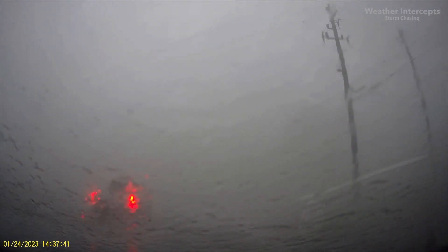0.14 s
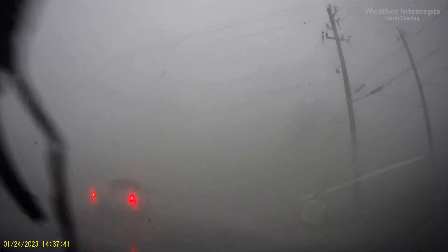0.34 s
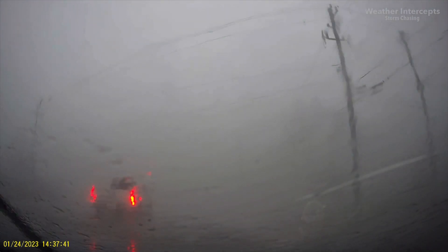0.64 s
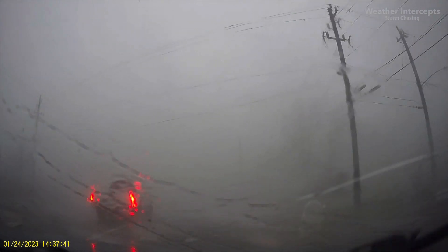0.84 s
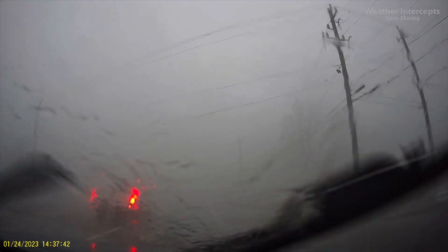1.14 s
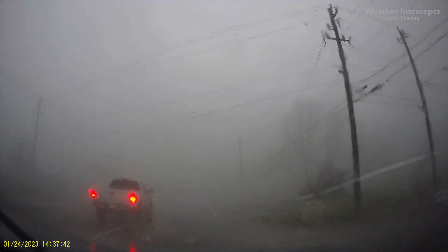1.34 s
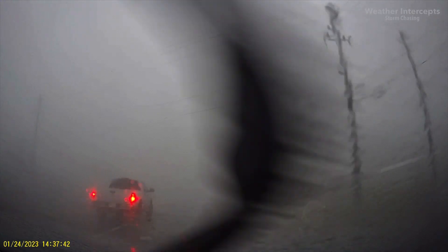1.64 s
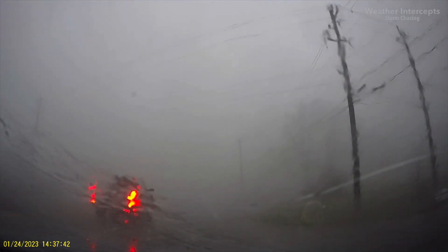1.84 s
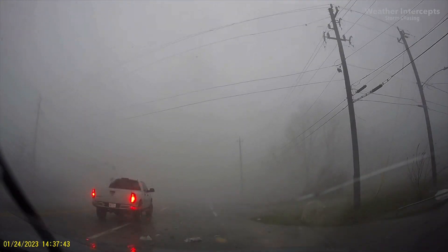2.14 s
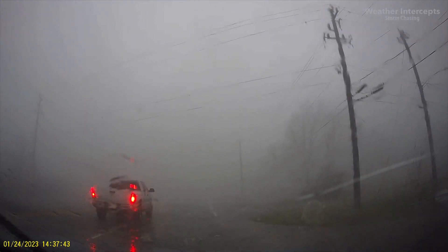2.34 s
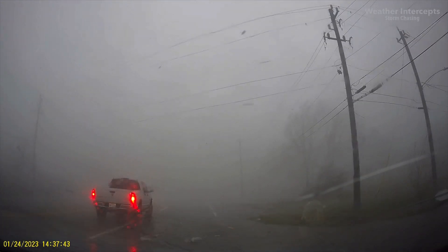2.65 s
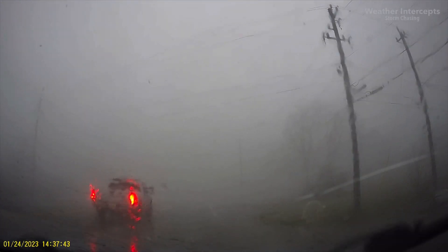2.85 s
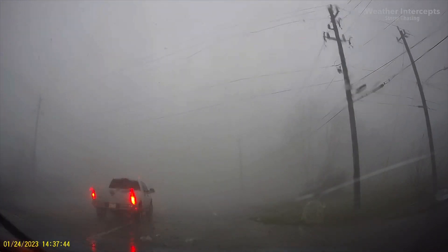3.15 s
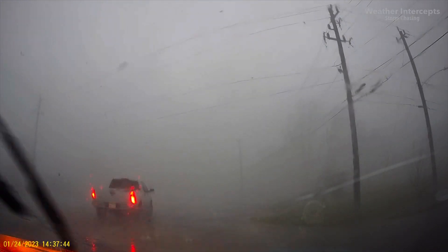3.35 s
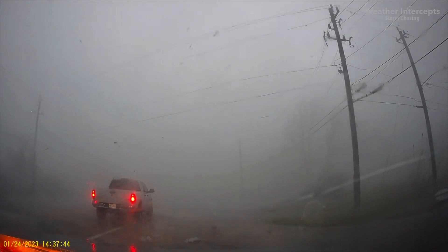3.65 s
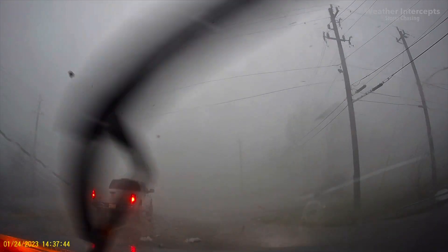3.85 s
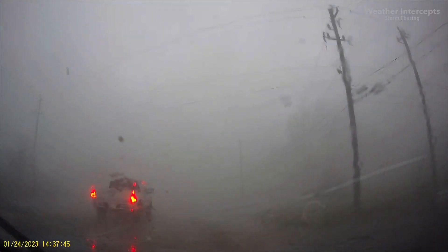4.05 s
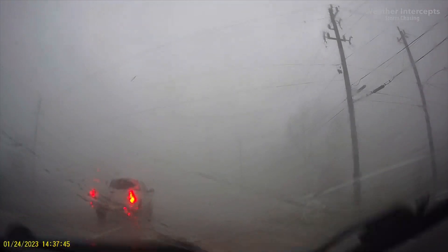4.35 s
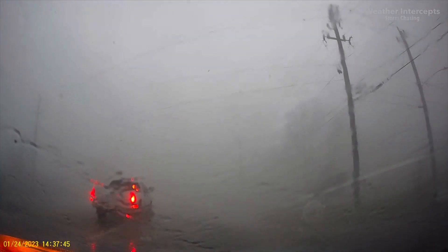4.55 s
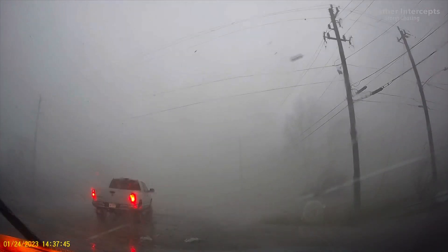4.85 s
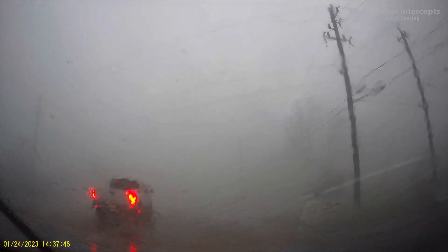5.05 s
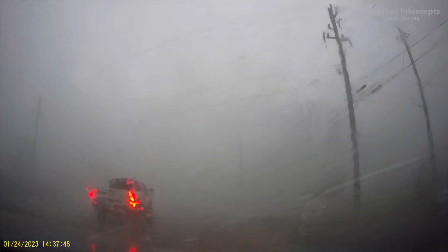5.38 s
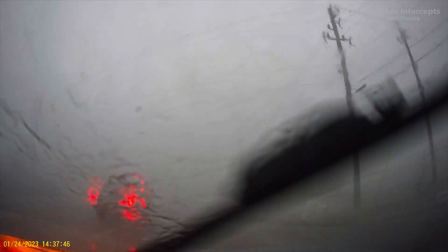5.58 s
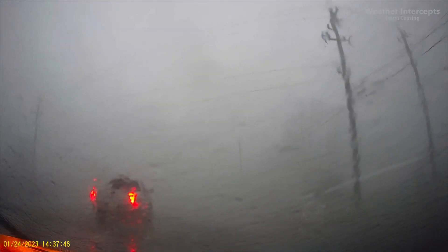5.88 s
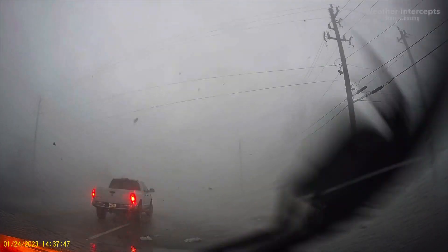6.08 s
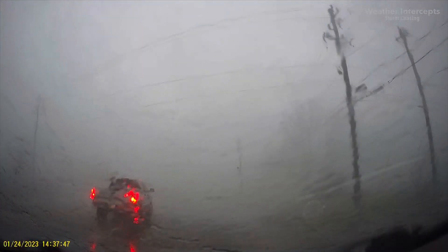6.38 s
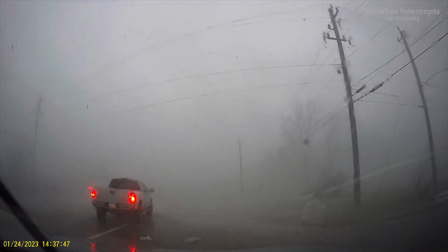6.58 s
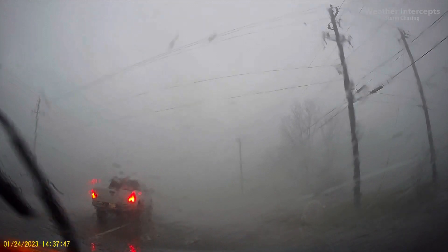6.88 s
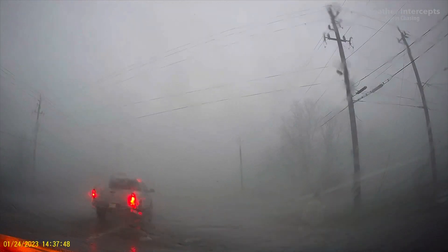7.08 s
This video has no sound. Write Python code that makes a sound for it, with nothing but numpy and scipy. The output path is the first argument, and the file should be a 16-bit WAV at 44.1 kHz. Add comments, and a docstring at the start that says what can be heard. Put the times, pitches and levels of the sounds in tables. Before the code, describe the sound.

Inside a parked vehicle in a violent storm, with a close mono microphone behind the windscreen, dry padded acoustics and a cut-off top end. From 0 s, deep unsteady wind booms in the cabin over a muffled outside roar, while rain drums on roof and glass, swelling in short sheets, strong at the start and near 1.6, 2.3, 2.8 and 5.6 s. Wipers give soft low bumps around 0.15, 1.0 (faint), 1.9, 2.8 (strongest), 3.7, 4.6, 5.4, 6.3 and 7.2 s. At 0.8 s debris slams the body: a heavy, loud multi-panel bang with short rattle. Grit ticks sharply from 0.13 s, thickest at 2.4-3 s, then sparse. Weaker thuds come from 2.4 s, including 2.8, 4.2, 4.8 (fuller), 5.3 and lastly 6.6 s. Wind and rain continue to the end.

```python
"""Inside a parked vehicle in a violent storm, heard from behind the windscreen for about 7 seconds.
From the start gusts boom in the cabin and roar outside, and sheets of rain drum on roof and glass.
Grit soon ticks on the glass, and the wipers bump at the end of each sweep, about every 0.9 s.
Flying debris strikes the body hard at 0.8 s. From 2.4 s come weaker thuds, the last at 6.6 s, with
grit thickest from 2.4 to 3 s. Noise makes wind and rain; fading tones make thuds and wiper bumps."""
import sys
import numpy as np
from scipy import signal
from scipy.fft import rfft, irfft
from scipy.io import wavfile
from scipy.ndimage import uniform_filter1d

SR = 44100
rng = np.random.default_rng(int(sys.argv[2]) if len(sys.argv) > 2 else 0)


def persist_wave(psi):
    """Save psi, clipped to +-1, as 16-bit WAV."""
    counts = np.round(np.clip(psi, -1, 1) * 32767).astype(np.int16)
    wavfile.write(sys.argv[1], SR, np.atleast_2d(counts).T)


N = 318402  # length [samples]

# storm strength: (time [s], cabin boom [dB], roar over the body [dB], extra drumming on the roof [dB])
STORM = [(0, -25, -31.5, 1), (.2, -24, -35, -5), (.3, -29, -37, -4), (.68, -27.5, -35.5, -2.5),
         (1.0, -31, -40, -2.5), (1.25, -27.5, -41.5, -5), (1.6, -34, -38, -2), (1.95, -29.5, -38.5, 1.5),
         (2.4, -36, -32.5, 2), (2.56, -33.5, -34, 0), (2.68, -29.5, -33, -1.5), (3.1, -26.5, -34, -2),
         (3.5, -30, -31, -3), (3.8, -26.5, -33.5, -5.5), (4.0, -28, -38.5, -4), (4.3, -29.5, -36.5, -3.5),
         (4.75, -27, -35, -2), (4.84, -25, -35.5, -2.5), (4.95, -36, -34.5, -2), (5.17, -28.5, -34.5, 0.5),
         (5.5, -28.5, -31, -5), (5.7, -27, -34.5, -0.5), (6.1, -31, -34.5, -3), (6.27, -28.5, -36, 2.5),
         (6.39, -25, -33.5, -1.5), (6.48, -44, -36.5, -2), (6.7, -33.5, -33, 0.5), (6.87, -29.5, -32, 1),
         (7.02, -38, -34.5, 1), (7.1, -27, -35.5, 2.5), (7.22, -36, -34, 1.5)]
# tone colour of the roof when struck: (frequency [Hz], relative gain [dB])
ROOF_COLOUR = [(15, -39.5), (150, -4), (350, -2), (480, -7.5), (550, 2), (800, 0.5), (1150, -2), (1350, -8),
               (1700, -15), (2100, -14), (2550, -44.5), (7000, -42)]
# tone colour of the glass when struck: (frequency [Hz], relative gain [dB])
GLASS_COLOUR = [(15, -63), (700, -40), (1700, 2), (2200, -4.5), (2550, -5), (2920, 2), (3300, -1),
                (4100, -1.5), (5200, -4), (6200, -11), (6800, -7), (7400, -23.5)]


def undb(db):
    """Turn decibels into an amplitude factor."""
    return 10 ** (np.asarray(db) / 20)


def unit(x):
    """Scale a sound to an average (RMS) strength of 1."""
    return x / np.sqrt(np.mean(x ** 2))


def curves(rows):
    """Join the points of each column with straight lines over the whole scene."""
    times, *columns = np.transpose(rows)
    return [np.interp(np.arange(N) / SR, times, column) for column in columns]


def fade(t60, size):
    """Exponential dying away that falls 60 dB in t60 seconds (at least 3 ms)."""
    return np.exp(-np.log(1000) * np.arange(size) / SR / max(t60, .003))


def colour(x, points):
    """Filter to a given spectrum without sounding early, using the cepstrum of the log gain."""
    hz, db = np.transpose(points)
    size = 8192
    log_hz = np.log(np.fft.rfftfreq(size, 1 / SR) + 1)
    log_gain = np.interp(log_hz, np.log(hz), db) * np.log(10) / 20
    cepstrum = irfft(log_gain)
    # fold the second half onto the first, so that the response starts at once
    cepstrum[1:size // 2] *= 2
    cepstrum[size // 2 + 1:] = 0
    response = irfft(np.exp(rfft(cepstrum)))
    return signal.oaconvolve(x, response)[:len(x)]


def ring(x, hz, width):
    """One resonance of the given width in Hz, with gain 1 at its centre."""
    return signal.lfilter(*signal.iirpeak(hz, hz / width, fs=SR), x)


def walk(rate):
    """Random wandering: levels held for 1 / rate seconds, then smoothed twice; RMS 1."""
    hold = int(SR / rate)
    levels = rng.standard_normal(N // 50)[:N // hold + 1]
    steps = np.repeat(levels, hold)
    smooth = uniform_filter1d(uniform_filter1d(steps, hold), hold)
    return unit(smooth[:N])


def drops(per_s, spread_db, hiss):
    """Noise bursts at random moments, some larger, each fading over a few ms above a steady hiss."""
    hit = rng.random(N) < per_s / SR
    size = np.minimum(rng.exponential(size=N), 3.5)
    power = hit * undb(2 * spread_db * size)
    splash = signal.lfilter([1], [1, -np.exp(-1 / (.0015 * SR))], power)  # fades over 1.5 ms
    return np.sqrt(splash / splash.mean() + hiss ** 2) * rng.standard_normal(N)


def wind():
    """Turbulence rings the cabin air and roars in eddies over the body."""
    # cabin air and door panels: (frequency [Hz], width [Hz], relative level [dB])
    cabin_modes = [(43.1, 13.1, 0), (29, 11.9, 0), (62.6, 46, -13)]
    # tone colour of the roar: (frequency [Hz], relative gain [dB])
    roar_colour = [(15, -23), (60, -4), (110, -2), (200, -4.5), (300, -8.5), (420, -13), (700, -21.5),
                   (1500, -65.5), (7000, -75)]
    buffet_db, buffets_per_s = 1.5, 12
    boom_db, roar_db, _ = curves(STORM)
    boom = 0
    for hz, width, db in cabin_modes:
        mode = ring(ring(rng.standard_normal(N), hz, width), hz, 3 * width)
        boom = boom + undb(db) * unit(mode)
    # buffeting feeds on itself, so its strength holds steadier than plain noise
    power = uniform_filter1d(boom ** 2, int(0.037 * SR))
    boom = boom / (power + .05) ** 0.23
    roar = colour(drops(300., 2.5, 1.0), roar_colour)
    boom_level = undb(boom_db + buffet_db * walk(buffets_per_s))
    roar_level = undb(roar_db + 0.87 * walk(26))
    return unit(boom) * boom_level + unit(roar) * roar_level


def spray_db():
    """Each sheet of rain swells to its peak and dies away; their powers add over the drizzle."""
    # sheets: (time of the peak [s], spray on the glass [dB], rise [s per 10 dB], fading [s per 10 dB])
    sheets = [(-0.015, -40.2, 0.023, 0.04), (0.113, -39.9, 0.201, 0.065), (0.353, -52.1, 0.085, 0.131),
              (0.483, -46.2, 0.43, 0.05), (0.677, -44.2, 0.113, 0.075), (1.203, -55.8, 0.081, 0.057),
              (1.405, -47.4, 0.027, 0.244), (1.635, -36.1, 0.108, 0.061), (1.792, -45.5, 0.184, 0.12),
              (2.099, -51.2, 0.113, 0.09), (2.303, -37.5, 0.069, 0.123), (2.422, -46.9, 0.146, 0.021),
              (2.609, -49.6, 0.062, 0.219), (2.799, -41.3, 0.153, 0.115), (3.111, -49.4, 0.332, 0.103),
              (3.279, -55.3, 0.124, 0.197), (3.407, -55.8, 0.175, 0.206), (3.621, -60.8, 0.582, 0.113),
              (3.893, -58.4, 0.082, 0.12), (4.049, -49.6, 0.08, 0.093), (4.224, -49.7, 0.057, 0.415),
              (4.366, -44.9, 0.145, 0.139), (4.576, -52.4, 0.254, 0.032), (4.955, -42.6, 0.085, 0.126),
              (5.175, -46.4, 0.114, 0.089), (5.297, -44.9, 0.096, 0.101), (5.458, -47.8, 0.071, 0.094),
              (5.618, -40.3, 0.059, 0.157), (5.792, -50.7, 0.511, 0.066), (6.015, -52.2, 0.094, 0.051),
              (6.272, -45.8, 0.381, 0.463), (6.746, -55.6, 0.27, 0.514), (6.932, -47.5, 0.025, 0.175),
              (7.033, -44.2, 0.032, 0.168), (7.156, -42.1, 0.145, 0.193)]
    drizzle_db = -66  # spray between the sheets
    t = np.arange(0, N, 64) / SR
    peak_s, db, rise, fading = np.transpose(sheets)[:, :, None]
    s_per_10_db = np.maximum(np.where(t < peak_s, rise, fading), 1 / 100)
    sheets_db = db - 10 * np.abs(t - peak_s) / s_per_10_db
    power = undb(2 * drizzle_db) + undb(2 * sheets_db).sum(axis=0)
    return np.interp(np.arange(N) / SR, t, 10 * np.log10(power))


def rain():
    """Sheets of drops strike roof and glass together, in patches."""
    roof_offset_db, roof_follows = -10, 0.62  # the roof takes this share of the spray level in dB
    glass_db = spray_db()
    extra_db = curves(STORM)[-1]
    roof_db = roof_offset_db + roof_follows * glass_db + extra_db
    patches = walk(25)
    splash = drops(570.0, 3.1, 1.4)
    roof = unit(colour(splash, ROOF_COLOUR)) * undb(roof_db + 0.7 * patches)
    glass_level = undb(glass_db + 0.45 * patches + .8 * walk(70))
    glass = unit(colour(splash, GLASS_COLOUR)) * glass_level
    return roof + glass


def cabin(x):
    """Short, padded reverberation of the seats and glass, made from fading noise."""
    t60_s, level_db = 0.06, -9
    size = SR // 4
    tail = rng.standard_normal(size) * fade(t60_s, size)
    tail = tail / np.sqrt(np.sum(tail ** 2))
    return x + undb(level_db) * signal.oaconvolve(x, tail)[:N]


def ticks():
    """Grit snaps in a burst of noise that rings the pane near its pitch and also knocks in the roof."""
    # grit on the glass: (time [s], peak [dB], pitch [Hz], share of ringing [0-1])
    grit = [(0.1336, -23, 4410, 0.38), (0.356, -33, 3000, 0.3), (0.946, -37.5, 4730, 0.14),
            (1.3991, -34, 2840, 0), (1.746, -29, 3530, 0.3), (1.997, -40, 2910, 0.2),
            (2.093, -26.5, 3160, 0.2), (2.263, -28.5, 2840, 0.07), (2.4325, -27, 3900, 0.4),
            (2.413, -38, 3100, 0.2), (2.444, -28, 3240, 0.3), (2.597, -32, 2780, 0.2),
            (2.6106, -20.5, 2930, 0.25), (2.7032, -27, 2870, 0.1), (2.7786, -34, 2730, 0.64),
            (2.802, -19.5, 4100, 0.34), (2.8366, -30.5, 2950, 0.2), (2.8696, -27, 3300, 0.2),
            (3.0302, -24, 4050, 0.7), (3.034, -39, 4030, 0.5), (3.3732, -35.5, 3480, 0.5),
            (3.8012, -36.5, 3280, 0.2), (4.072, -32, 2830, 0.4), (4.7666, -37, 2900, 0.27),
            (4.831, -33, 3160, 0.2), (5.602, -29, 3360, 0.1), (6.023, -30.5, 2900, 0.26),
            (6.9226, -28, 3000, 0)]
    t60_s = .013
    out, size = np.zeros(N + SR), SR // 8
    for s, db, hz, share in grit:
        burst = rng.standard_normal(size) * fade(t60_s, size)
        burst[0] += 5  # first contact
        crack = unit(colour(burst, GLASS_COLOUR)) + unit(colour(burst, ROOF_COLOUR))
        share = np.clip(share, 0, 1)
        ringing = unit(ring(ring(crack, hz, 700.), hz, 900.))
        crack = (1 - share) * unit(crack) + share * ringing
        start = int(s * SR)
        out[start:start + size] += undb(db) * crack / np.abs(crack).max()
    return out[:N]


def wiper():
    """Rubber presses softly, so the cowl swells for a few cycles and then dies away."""
    # bumps at the end of each sweep: (time [s], level [dB], pitch of the cowl [Hz], t60 [s])
    bumps = [(0.151, -22.5, 195, 0.094), (1.025, -38.5, 212, 0.12), (1.92, -20, 140, 0.046),
             (1.939, -24, 201, 0.06), (2.794, -15.5, 202, 0.079), (3.641, -21, 289, 0.051),
             (3.696, -23, 263, 0.063), (4.571, -21, 212, 0.032), (5.44, -22.5, 192.6, 0.14),
             (6.335, -19, 183, 0.019), (7.198, -22.5, 217, 0.084)]
    swell_s = 0.014
    out, size = np.zeros(N + SR), SR // 4
    t = np.arange(size) / SR
    for s, db, hz, t60 in bumps:
        dying = fade(t60, size)
        # the fade is scaled to begin at full strength when the swell ends
        shape = np.where(t < swell_s, t / swell_s, dying / dying[int(swell_s * SR)])
        tone = np.sin(2 * np.pi * hz * t)
        tone += 0.12 * np.sin(2 * np.pi * 1.402 * hz * t)
        tone += 0.5 * np.sin(2 * np.pi * 0.47 * hz * t)
        start = int(s * SR)
        out[start:start + size] += undb(db) * shape * tone
    return out[:N]


def thuds():
    """A debris blow rings the panels pitched near the one it strikes; loose trim rattles with them."""
    # body panels: (frequency [Hz], relative level [dB], t60 before damping [s])
    body_panels = [(59.3, -3.5, 0.3), (125.3, -6, 0.18), (165.3, -2, 0.12), (194, -5, 0.19),
                   (265, -3.5, 0.15), (344, -12.5, 0.31), (408.4, -5, 0.11), (556.5, -6, 0.17),
                   (720, -6.5, 0.064), (865, -15.5, 0.19), (936, -23.5, 0.3), (1104, -9, 0.1),
                   (1540, -19.5, 0.11), (1540, -29, 0.14), (1720, -45.5, .13), (1870, -17, 0.14),
                   (2950, -35, .1), (3000, -31, .11), (3553, -30, .1), (4200, -32, .07)]
    # debris: (time [s], blow [dB], pitch of the struck panel [Hz], spread over other panels [octaves],
    # damping [factor], rattle relative to the blow [dB])
    blows = [(.796, -6.5, 59, 0.41, 1.6, -19), (0.8014, -6, 180, 1.1, 1.4, -13.5),
             (.807, -15.5, 595, 1.3, 1.02, -5.5), (2.375, -28, 209, 0.42, 0.97, -1.5),
             (2.8, -21, 870, 0.29, 4.7, -15), (2.84, -24, 307, 1.6, 5.2, -5),
             (3.002, -36, 600, .5, 2.1, -11), (3.03, -34.5, 1800, 0.48, 1.7, -7),
             (3.627, -34, 595, 0.62, 3.2, -14), (3.652, -33, 605, 0.68, 1.9, -17),
             (3.796, -31, 870, 0.28, 2.9, -13), (4.197, -19.5, 130, 0.22, 1.36, -34),
             (4.233, -36.5, 700, 0.5, 2.1, -16), (4.823, -17.5, 250, 1.23, 1.37, -47),
             (5.292, -30.5, 208, 0.15, 0.74, -38), (6.594, -23, 465, 0.47, 2.2, -9)]
    # tone colour of the loose trim: (frequency [Hz], relative gain [dB])
    trim_colour = [(15, -16), (300, 6.5), (600, 1), (1200, -6), (1800, -12), (2500, -26.5), (2900, -17.5),
                   (4300, -25), (5000, -67), (7400, -63)]
    out, size = np.zeros(N + SR), SR // 2
    t = np.arange(size) / SR
    contact = 1 - np.exp(-t / 0.00087)  # the blow builds up over the contact time
    for s, db, struck_hz, spread, damping, rattle_db in blows:
        detune = 1 + 0.016 * rng.standard_normal(len(body_panels))
        panels = np.zeros(size)
        for k, (hz, panel_db, t60) in enumerate(body_panels):
            # the lowest mode first draws the cabin air away, the smaller panels push it
            sign = 1 if k else -1
            distance = np.log2(hz / struck_hz) / spread
            tone = np.sin(2 * np.pi * hz * detune[k] * t) * fade(t60 / damping, size)
            panels += sign * undb(panel_db - 5.7 * distance ** 2) * tone
        panels *= contact
        rattle = unit(colour(rng.standard_normal(size), trim_colour))
        rattle = rattle * fade(.18 / damping, size) * contact
        thud = panels / np.abs(panels).max() + undb(rattle_db) * rattle
        start = int(s * SR)
        out[start:start + size] += undb(db) * thud
    return out[:N]


def scene():
    """Add all sources into one channel; only the grit ticks get the cabin's reverberation."""
    return (wind() + rain() + cabin(ticks()) + wiper() + thuds())[None, :]


def record(dry):
    """The microphone's low-pass filter cuts the top steeply."""
    top_hz = 7450
    low_pass = signal.ellip(12, .3, 75, top_hz, fs=SR, output="sos")
    return signal.sosfilt(low_pass, dry)


dry = scene()
out = record(dry)
persist_wave(out)
```